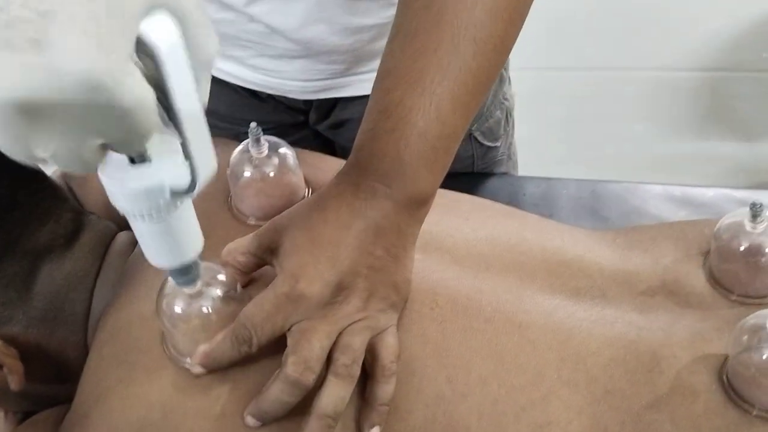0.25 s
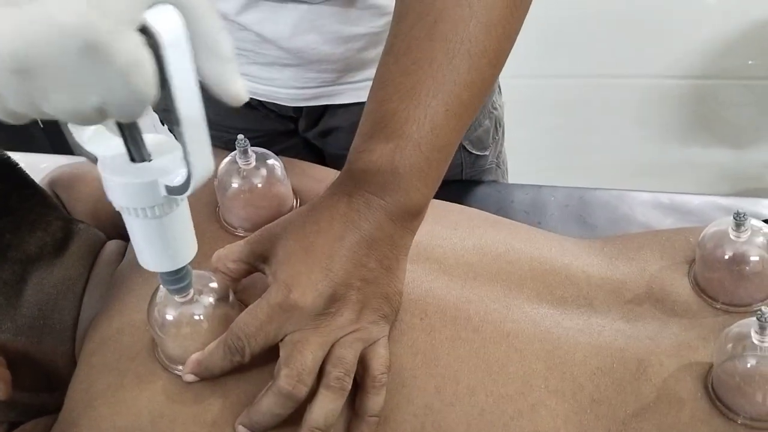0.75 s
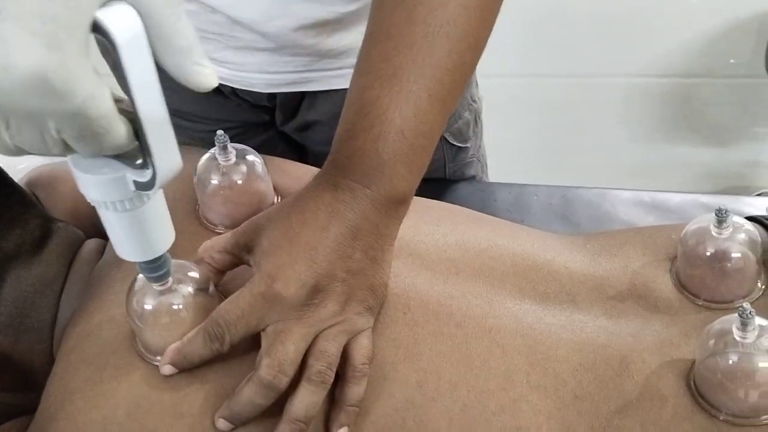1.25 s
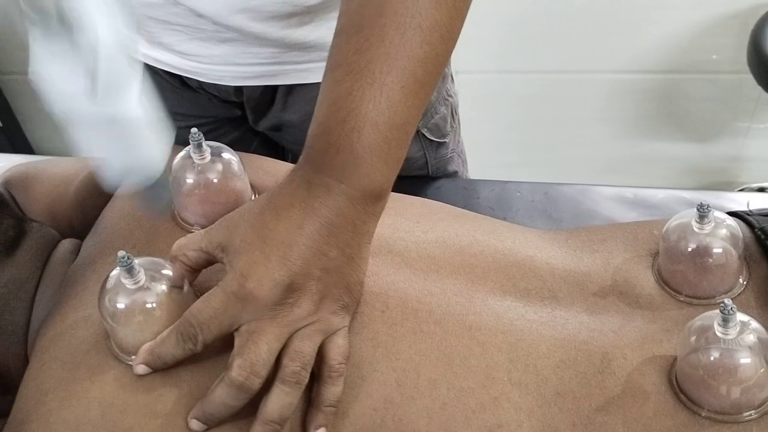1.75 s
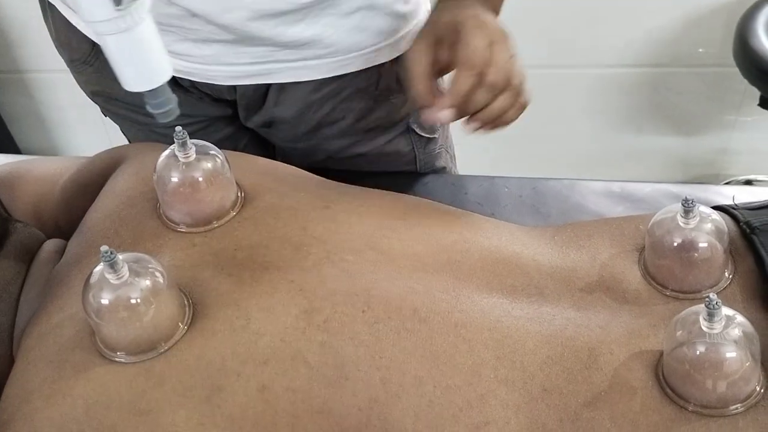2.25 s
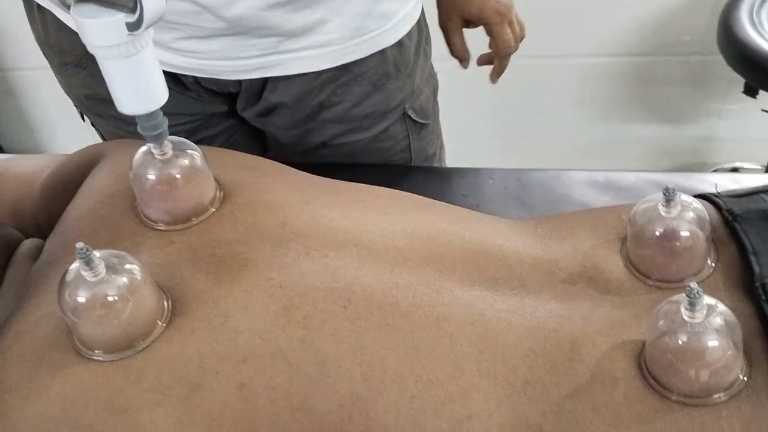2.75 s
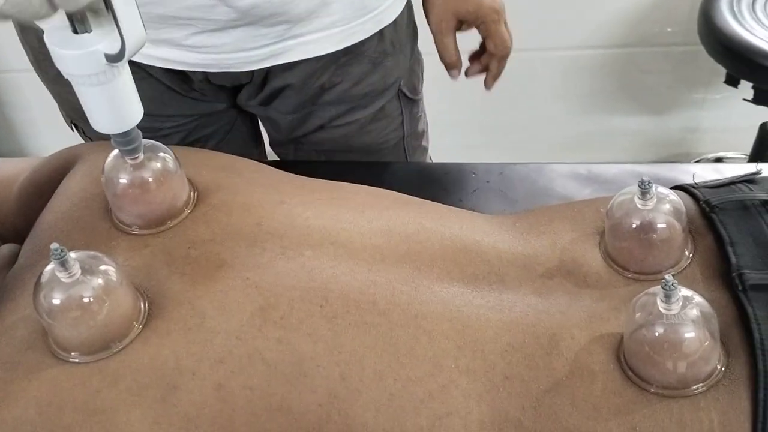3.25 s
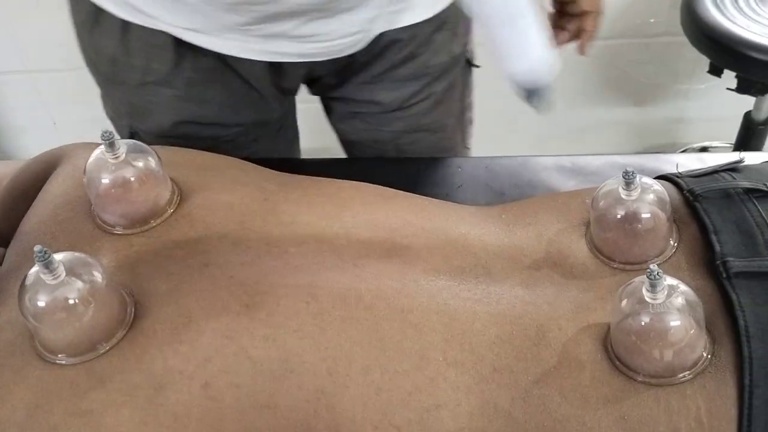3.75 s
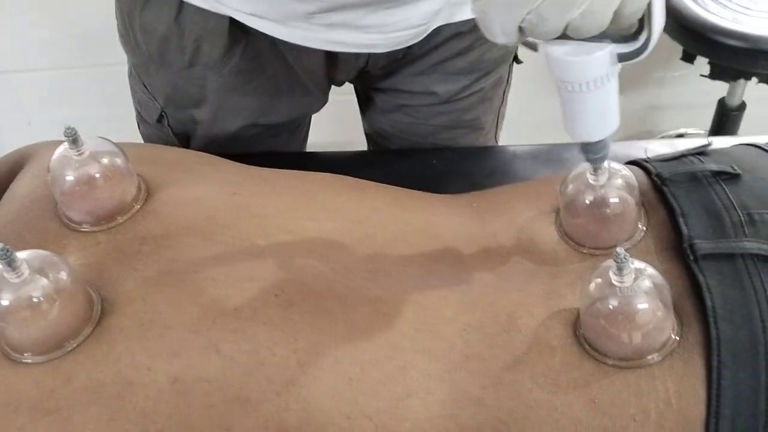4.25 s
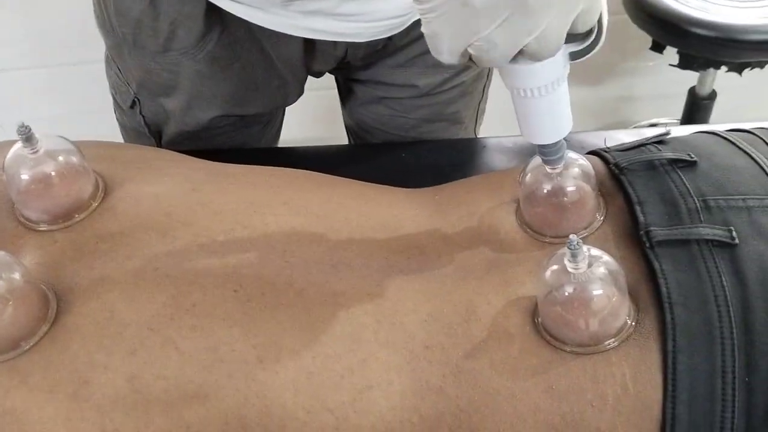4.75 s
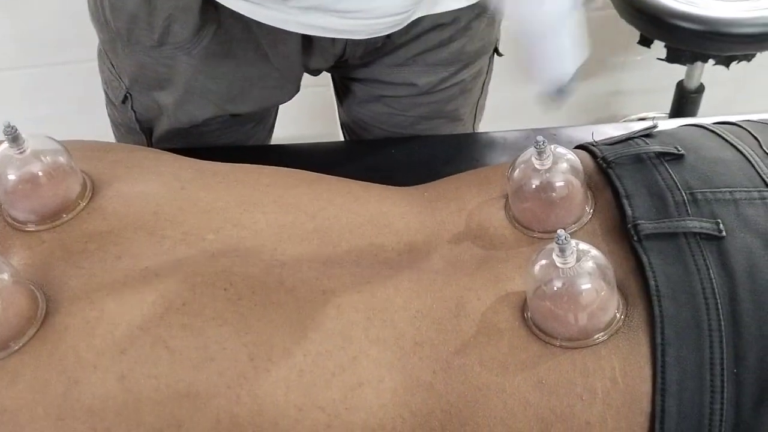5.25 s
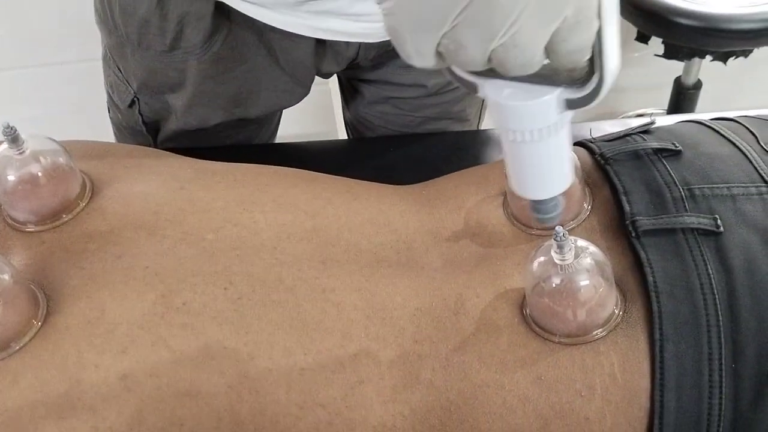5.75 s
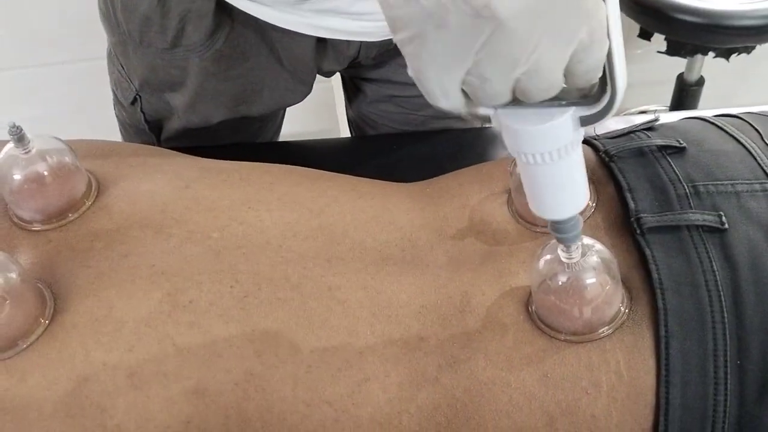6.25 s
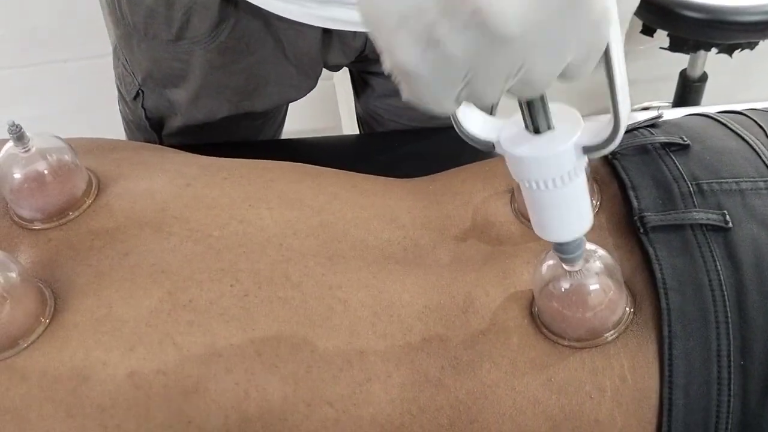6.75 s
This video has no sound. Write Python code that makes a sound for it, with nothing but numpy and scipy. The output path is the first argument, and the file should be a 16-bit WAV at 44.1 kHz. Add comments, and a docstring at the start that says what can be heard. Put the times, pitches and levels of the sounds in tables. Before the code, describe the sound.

A hand-held plastic vacuum pump clicks and hisses with each squeeze, then its piston snaps back five times with a bright metallic spring ring, indoors.

```python
"""A small hard-walled room: a pistol-grip vacuum pump close to the microphone draws air from plastic cups.
When the nozzle is pulled off a cup the piston snaps home: a noise crack, a thump and a spring ring of damped sines.
Each stroke clicks (short damped sines) and sends air through the valve (banded noise and a gliding whistle).
Gloves and cloth brush softly; a faint low hum wavers under the room's noise, and the walls add a dense echo."""
import sys
import numpy as np
from scipy import signal
from scipy.fft import rfft, irfft, next_fast_len
from scipy.io import wavfile
from scipy.ndimage import uniform_filter1d

SR = 44100
rng = np.random.default_rng(int(sys.argv[2]) if len(sys.argv) > 2 else 0)


def digitize_waveform(pressure):
    """Quantize a signal to 16-bit integers and store it at the path in sys.argv[1].

    Rows of a 2-D input are taken as channels; values are limited to [-1, 1].
    """
    field = np.atleast_2d(pressure).T
    bounded = np.clip(field, -1, 1)
    quanta = np.round(bounded * 32767).astype(np.int16)
    wavfile.write(sys.argv[1], SR, quanta)


N = 309141
TIME = np.arange(N) / SR

# resonances of the return spring: (frequency [Hz], level when snapped [dB], level when nudged [dB])
SPRING_MODES = [(741, -21, -32), (1115, -12.5, -27.5), (1547, -4.5, -23.5), (1604, -10, -14.5),
                (2016, -2, -6), (2072, -2.5, -14.5), (2578, -2.5, -5), (3060, -18, -17), (3170, 2.5, 1.5),
                (3410, -8, -8), (3750, -10, -16.5), (3847, 0.5, -5.5), (4120, -3, -19.5), (4507, 1, 1),
                (4574, -6, -8), (4846, -9.5, -9), (5050, -6, -13), (5163, 4, -7), (5340, -3, -26.5),
                (5905, 0.5, 2.5), (6410, -5.5, -20.5), (6680, 1, -16), (6830, -4.5, -13.5),
                (7170, -5, -14.5), (7350, -9, -28), (7320, -6.5, -19), (7930, -12.5, -24.5),
                (8200, -9.5, -32), (8370, -13, -31), (8860, -11.5, -25.5)]
# the coils' crowd of weak modes, as a noise spectrum: (frequency [Hz], relative level [dB])
COIL_SPECTRUM = [(100, -23), (400, -13.5), (600, -21.5), (800, -15.5), (1900, -5), (3000, 3), (4800, 4),
                 (7000, -3.5), (8500, -15.5), (10000, -9.5), (14000, -28.5)]
# modes of the grip's hollow housing: (frequency [Hz], relative level [dB], t60 [s])
HOUSING_MODES = [(226, -9.5, 0.022), (380.4, -9, 0.031), (597, -10, 0.013), (852, 3.5, 0.016),
                 (1326, 0.5, 0.014), (1930, -4.5, .007)]
# the handle is squeezed: (first click [s], its level [dB], its brightest frequency [Hz], travel to the stop [s],
# click at the stop [dB], air [dB], length of the hiss [s], highest whistle [Hz])
SQUEEZES = [(.3030, -15.5, 5200, 0.072, -5, -40.5, 0.094, 9100),
            (.6590, -9, 6200, .066, -11.5, -35, 0.088, 10740),
            (1.5169, -3, 5780, 0.072, -43, -37, .18, 10640),
            (3.1224, -2, 6740, .083, -13, -35, 0.36, 10430),
            (6.7457, -23.5, 7060, .0684, -22, -53, 0.18, 9000)]
# the handle is let go and swings back: (landing [s], its click [dB], swing [s], piston's knock [dB],
# air [dB], highest whistle [Hz])
RETURNS = [(0.5641, -14.5, 0.057, -29.5, -42.5, 5570), (0.9606, -8, .051, -20, -40.5, 9000),
           (1.7035, -7, 0.024, -28.5, -46.5, 4800), (3.3616, -5, 0.032, -32, -45, 8970),
           (5.2227, -28, .08, -52, -52, 9500), (6.9987, -30.5, 0.03, -48, -59, 8500)]
REBOUND_S = 0.0055  # from the first click of a squeeze to its one bounce


def undb(db):
    """Decibels to amplitude."""
    return 10 ** (np.asarray(db) / 20)


def unit(x):
    """Scale to rms 1."""
    return x / np.sqrt(np.mean(x ** 2))


def fade(t, t60):
    """Exponential decay, 60 dB in t60."""
    return np.exp(-np.log(1000) * t / t60)


def colour(x, points):
    """Filter by (frequency [Hz], level [dB]) points joined on a log-frequency axis."""
    hz, db = np.transpose(points)
    size = next_fast_len(2 * len(x))
    f = np.maximum(np.arange(size // 2 + 1) * SR / size, 1)
    gain = undb(np.interp(np.log(f), np.log(hz), db))
    return irfft(rfft(x, size) * gain, size)[:len(x)]


def noise(points, count):
    """Coloured noise of rms 1."""
    return unit(colour(rng.standard_normal(count), points))


def walk(rate):
    """A smooth random wander of rms near 1, with a new target rate times a second."""
    k = int(SR / rate)
    steps = np.repeat(rng.standard_normal(N // k + 1), k)
    return unit(uniform_filter1d(steps, k)[:N])


def add(out, s, x):
    """Mix x into out from time s on."""
    i = max(int(s * SR), 0)
    out[i:i + len(x)] += x[:max(N - i, 0)]


def ring(modes, t, detune):
    """Damped sines (frequency [Hz], level [dB], t60 [s]), a little different at every blow."""
    total = np.zeros(len(t))
    for hz, db, t60 in modes:
        struck_hz = hz * (1 + detune * rng.standard_normal())
        total += undb(db) * fade(t, t60) * np.sin(2 * np.pi * (struck_hz * t + rng.random()))
    return total


def snaps(spring_t60=0.59, coils_db=-11, coils_t60=0.75, crack_t60=0.029, crack_rise_s=0.002,
          rattle_db=-17, rattle_t60=0.074):
    """The piston slams home: a crack, a short rattle, a thump of the barrel and the long ring of the spring."""
    # (time [s], ring [dB], crack [dB], thump [dB], tilt [dB per octave],
    # most strongly struck resonance [Hz], its lift [dB])
    slams = [(3.409, -20.5, -7.5, -51.5, 0.7, 4550, 4), (4.0921, -18.5, -5.5, -42, -1, 4480, 6.5),
             (4.8530, -20, -6.5, -45, 0, 2554, 8), (5.6879, -19.5, -6, -51, 5, 2280, 7),
             (6.4750, -21.5, -11, -45, 3, 1985, 7.5)]
    # the piston's crack: (frequency [Hz], relative level [dB])
    crack_spectrum = [(200, -26), (1000, -17), (2700, -6), (5000, 1), (7200, 6), (10000, -15), (14000, -29)]
    # the barrel's thump: (frequency [Hz], relative level [dB], t60 [s])
    thump_modes = [(85, -10, 0.28), (119, -5.5, 0.32), (165.4, 4, 0.3), (242, -6.5, 0.066),
                   (390.4, -6.5, .3)]
    out, t = np.zeros(N), TIME[:SR]
    hz, mode_db, _ = np.transpose(SPRING_MODES)
    rise = 1 - np.exp(-(t / crack_rise_s) ** 2)
    for s, ring_db, crack_db, thump_db, tilt_db, struck_hz, lift_db in slams:
        # how the spring is hit decides which resonances come out
        lift = lift_db * np.exp(-((hz - struck_hz) / 330) ** 2)
        levels_db = mode_db + tilt_db * np.log2(hz / 4000) + lift
        coil = spring(levels_db, t, spring_t60)
        coil += undb(coils_db) * noise(COIL_SPECTRUM, SR) * fade(t, coils_t60)
        crack_decay = fade(t, crack_t60) + undb(rattle_db) * fade(t, rattle_t60)
        crack = noise(crack_spectrum, SR) * crack_decay
        thump = ring(thump_modes, t, detune=0.0083) * (1 - np.exp(-t / 0.0039))
        slam = undb(ring_db) * coil + undb(crack_db) * crack + undb(thump_db) * thump
        add(out, s - .001, rise * slam)  # the rise begins 1 ms ahead
    return out


def spring(levels_db, t, t60, split=.0065, side_db=-2):
    """Each resonance is a main coil mode between two weaker neighbours that beat with it; rms near 1 at the start."""
    hz = np.array(SPRING_MODES)[:, 0]
    cluster = [(1, 0), (1 - split, side_db), (1 + split, side_db)]  # (frequency ratio, level [dB])
    modes = [(f * ratio, db + less_db, t60) for f, db in zip(hz, levels_db) for ratio, less_db in cluster]
    start_rms = np.sqrt(np.sum(undb(np.array(modes)[:, 1]) ** 2) / 2)
    return ring(modes, t, detune=.0025) / start_rms


def nudges(swell_s=0.0029, damped_t60=0.27, buzz_db=-13):
    """A light touch favours a few resonances; they swell softly and buzz against the housing."""
    # the spring is only nudged: (time [s], level [dB])
    touches = [(2.450, -25), (2.495, -27), (2.511, -25.5)]
    out, t = np.zeros(N), TIME[:SR]
    for s, db in touches:
        coil = spring(np.array(SPRING_MODES)[:, 2], t, damped_t60)
        buzz = undb(buzz_db) * noise(COIL_SPECTRUM, SR) * fade(t, damped_t60)
        add(out, s, undb(db) * (coil + buzz) * (1 - np.exp(-t / swell_s)))
    return out


def clicks(focus_db=16, rise_s=0.00032, chatter_db=-25, chatter_t60=0.12):
    """Plastic parts meet: the grip ticks, the housing knocks and the loose parts chatter briefly."""
    # modes of the plastic grip: (frequency [Hz], level before focus on the brightest [dB], t60 [s])
    grip_modes = [(3500, -4, 0.0057), (3984, -6, 0.016), (4815, 0, 0.0056), (5500, -4.5, 0.0072),
                  (5760, 3, 0.0036), (6724, 1.5, 0.0066), (7830, -7, 0.0031)]
    out, t = np.zeros(N), TIME[:SR // 8]
    rise = 1 - np.exp(-(t / rise_s) ** 2)
    for s, db, bright_hz, housing_db in contacts():
        # modes lose focus_db for each octave away from the brightest frequency
        modes = [(hz, mode_db - focus_db * abs(np.log2(hz / bright_hz)), t60)
                 for hz, mode_db, t60 in grip_modes]
        tick = rise * ring(modes, t, detune=0.053)
        body = rise * ring(HOUSING_MODES, t, detune=0.056)
        chatter = rise * noise(valve_band(bright_hz), len(t)) * fade(t, chatter_t60)
        click = tick / abs(tick).max() + undb(housing_db) * body / abs(body).max()
        add(out, s, undb(db) * (click + undb(chatter_db) * chatter))
    return out


def contacts(press_housing_db=-37, rebound_db=-13):
    """Every click as (time, level, brightest Hz, housing dB): a squeeze clicks, rebounds and stops; a return lands."""
    # small ticks: loose parts as the grip shifts, and at 0.39 s the first squeeze's stop bouncing back: (time
    # [s], peak of the tick [dB])
    loose_ticks = [(.158, -34), (0.3934, -11), (0.4728, -19.5), (.557, -19), (1.2346, -36), (1.4763, -28),
                   (1.9138, -27), (1.937, -37)]
    # how each kind of contact sounds: (brightest frequency [Hz], housing [dB])
    stop, landing, loose = (5000, -15.5), (4550, -14), (4650, -16.5)
    for s, db, bright_hz, travel_s, stop_db, *_ in SQUEEZES:
        # the first click barely reaches the housing
        yield s, db, bright_hz, press_housing_db
        yield s + REBOUND_S, db + rebound_db, bright_hz, press_housing_db
        yield s + travel_s, stop_db, *stop
    for s, db, *_ in RETURNS:
        yield s, db, *landing
    for s, db in loose_ticks:
        yield s, db, *loose


def knocks(soft_hz=800):
    """The piston turns round at the start of each return; this soft blow favours the housing's low modes."""
    out, t = np.zeros(N), TIME[:SR // 8]
    modes = [(hz, db - 20 * np.log10(1 + (hz / soft_hz) ** 2), t60) for hz, db, t60 in HOUSING_MODES]
    for s, _, swing_s, db, *_ in RETURNS:
        knock = ring(modes, t, detune=0.052) * (1 - np.exp(-t / 0.0023))
        add(out, s - swing_s, undb(db) * knock / abs(knock).max())
    return out


def valve(flutter_db=1.5, grain_db=3, squeeze_hz=6100, leak_db_per_s=56.5, lead_s=.006,
          return_hz=4930, return_s=.085, return_swell_db=3.5, whistle_fall_s=.04, seating_hz=5300):
    """Air hisses through the valve in grainy spurts, and its gap whistles as the flow rises and falls."""
    # the nozzle slides onto a cup and air slips past it: (start [s], length [s], level before flutter [dB])
    seatings = [(2.916, 0.29, -47), (3.964, 0.11, -55)]
    out = np.zeros(N)
    flutter = unit(undb(flutter_db * walk(160) + grain_db * walk(900)))
    for s, _, _, travel_s, _, db, length_s, top_hz in SQUEEZES:
        # the hiss starts just before the click and sinks as the pressure evens out
        add(out, s - lead_s, undb(db) * hiss(length_s, squeeze_hz, -leak_db_per_s * length_s))
        flow = np.sin(np.pi * progress(travel_s))
        add(out, s + REBOUND_S, undb(db) * whistle(flow, top_hz))
    for s, *_, db, top_hz in RETURNS:
        # the hiss swells as the handle speeds back; the whistle falls before the landing
        add(out, s - return_s, undb(db - return_swell_db) * hiss(return_s, return_hz, return_swell_db))
        flow = np.cos(np.pi / 2 * progress(whistle_fall_s))
        add(out, s - whistle_fall_s, undb(db) * whistle(flow, top_hz))
    for s, length_s, db in seatings:
        add(out, s, undb(db) * hiss(length_s, seating_hz, -leak_db_per_s * length_s))
    return out * flutter


def hiss(length_s, hz, change_db):
    """A spurt of air round hz whose level changes by change_db along the way."""
    u = progress(length_s)
    return noise(valve_band(hz), len(u)) * undb(change_db * u) * signal.windows.tukey(len(u), .15)


def whistle(flow, top_hz, waver=.012, level_db=-9.5, low_share=.74):
    """The valve's gap sings higher the faster the air flows (flow 0-1); low_share of top_hz is the no-flow pitch."""
    hz = top_hz * (low_share + (1 - low_share) * flow) * (1 + waver * walk(400)[:len(flow)])
    tone = np.sin(2 * np.pi * np.cumsum(hz) / SR)
    return undb(level_db) * tone * signal.windows.tukey(len(flow), .4)


def valve_band(hz, low_db=-22, edge_db=-5, high_db=-22):
    """A broad hump round hz, as (frequency [Hz], level [dB]) points."""
    return [(hz / 2.45, low_db), (hz / 1.34, edge_db), (hz, 0), (hz * 1.17, edge_db / 2), (hz * 1.89, high_db)]


def progress(length_s):
    """Runs from 0 to 1 in length_s, or in 10 ms if that is longer."""
    return np.linspace(0, 1, max(int(length_s * SR), SR // 100))


def rustles():
    """Soft, low brushing of gloves and cloth: noise whose level flickers."""
    # gloves and clothes brush as the hands move: (start [s], end [s], level before flicker [dB])
    brushes = [(2.72, 3.156, -50), (3.2, 3.4, -58), (3.769, 4.1, -56)]
    # (frequency [Hz], relative level [dB])
    cloth = [(50, -24.5), (130, -2), (350, -5), (700, -18), (1400, -18), (3000, -19.5), (8000, -32.5)]
    out = np.zeros(N)
    for start, end, db in brushes:
        count = max(int((end - start) * SR), SR // 100)
        add(out, start, undb(db) * noise(cloth, count) * signal.windows.tukey(count, .5))
    return out * undb(2.9 * walk(40))


def room(x, build_s=.005, count=24):
    """Hard walls: a dense tail that dies at its own rate in each band and keeps changing as the pump is moved about."""
    # the room's decay: (frequency [Hz], t60 [s], reverberant level [dB])
    decay = [(150, 0.4, 1), (500, 0.3, 0.5), (1497, 0.54, -2), (3950, 0.7, -10), (6860, 0.6, -5),
             (10990, 0.17, -3.5)]
    t, (hz, t60, db) = TIME[:SR], np.transpose(decay)
    # eight seconds of noise, split into overlapping bands
    spectrum = rfft(rng.standard_normal(8 * SR))
    log_f = np.log(np.arange(4 * SR + 1) / 8 + 1)
    bands = np.array([irfft(spectrum * np.interp(log_f, np.log(hz), share)) for share in np.eye(len(decay))])
    envelopes = fade(t, t60[:, None]) * (1 - np.exp(-(t / build_s) ** 2))
    envelopes = envelopes * (undb(db) / np.linalg.norm(envelopes, axis=1))[:, None]
    # overlapping stretches of the sound each get a tail cut from another place in the noise
    out, hop = np.zeros(N + SR * 2), N // count + 1
    padded, blend = np.pad(x, (hop, 2 * hop)), signal.windows.cosine(2 * hop)
    for k in range(count + 1):
        i = rng.integers(bands.shape[1] - SR)
        tail = np.sum(bands[:, i:i + SR] * envelopes, axis=0)
        echo = signal.fftconvolve(padded[k * hop:(k + 2) * hop] * blend, tail)
        out[k * hop:k * hop + len(echo)] += echo
    return out[hop:hop + N]


def background(hum_waver_db=3.0, hum_drift_hz=1.8):
    """Room noise and a low hum of sines wavering in level and pitch; both grow fainter in the last seconds."""
    # room noise spectrum: (frequency [Hz], relative level [dB])
    air_spectrum = [(20, -44), (33, -24.5), (48, -5.5), (70, -16), (130, -7.5), (229, -11.5), (420, -10),
                    (520, -18.5), (1170, -20), (2020, -27), (5520, -25), (6740, -28), (8240, -38),
                    (10100, -54.5), (12000, -49), (16000, -63.5)]
    # course of noise and hum together, before their trims: (time [s], level [dB])
    air_course = [(0, -51), (3.3, -51), (4.9, -60), (7, -65)]
    # hum tones: (frequency before drift [Hz], level before waver and trim [dB])
    hum_tones = [(49.5, -16.5), (166.5, -3.5)]
    # course of the hum alone, before its trim: (time [s], level [dB])
    hum_course = [(0, .5), (1.8, 0.5), (2.2, -4), (7, -4)]
    hum = np.zeros(N)
    for hz, db in hum_tones:
        level = undb(db + hum_waver_db * walk(7.7)) * np.sqrt(2)
        phase = 2 * np.pi * np.cumsum(hz + hum_drift_hz * walk(8.8)) / SR
        hum += level * np.sin(phase)
    hum *= undb(np.interp(TIME, *np.transpose(hum_course)) - 2.0)
    air = noise(air_spectrum, N) * undb(0.69 * walk(6.0) - 1.5)
    return (air + hum) * undb(np.interp(TIME, *np.transpose(air_course)))


def scene(spring_wet_db=3.5, plastic_wet_db=-3):
    """The pump close by, its echo in the room, the brushing of cloth and the room's own noise."""
    steel = snaps() + nudges()
    plastic = clicks() + knocks() + valve()
    echo = room(undb(spring_wet_db) * steel + undb(plastic_wet_db) * plastic)
    return (steel + plastic + echo + rustles() + background())[None]


def record(dry, top_hz=15800):
    """The microphone dulls the top, peaks beyond full scale clip, and the band ends at top_hz."""
    # the microphone's response: (frequency [Hz], level [dB])
    response = [(22, -22), (45, -2), (7500, 0.5), (9300, -7), (10500, -22), (11600, -34.5), (13000, -29.5),
                (14800, -17), (16000, -27.5)]
    dulled = np.clip(colour(dry[0], response), -1, 1)
    band_end = signal.ellip(8, .2, 70, top_hz, fs=SR, output="sos")
    return signal.sosfilt(band_end, dulled)[None]


dry = scene()
out = record(dry)
digitize_waveform(out)
```